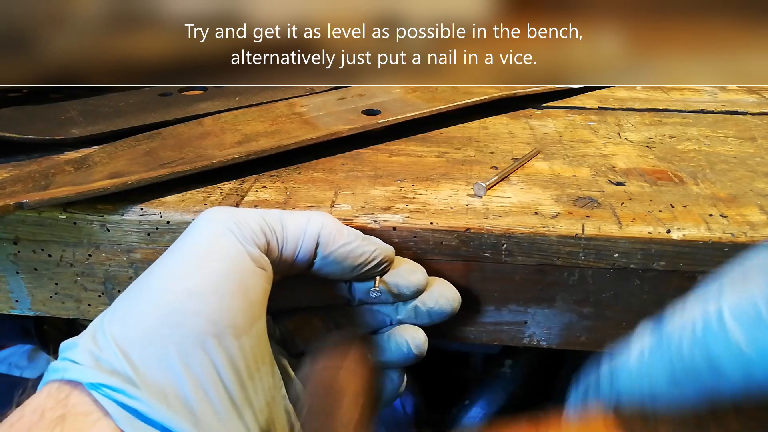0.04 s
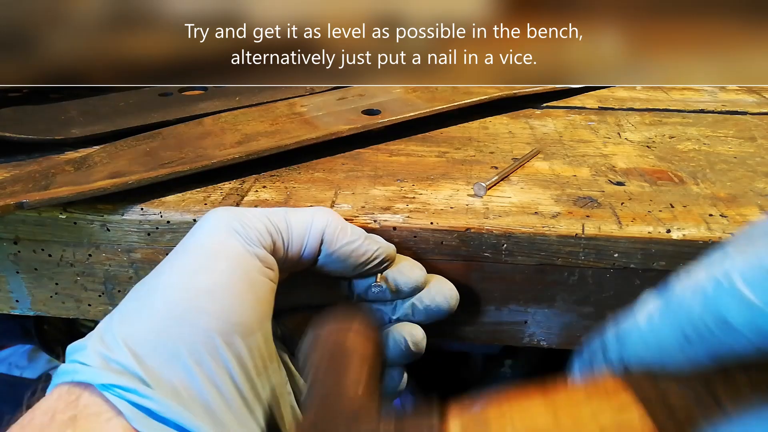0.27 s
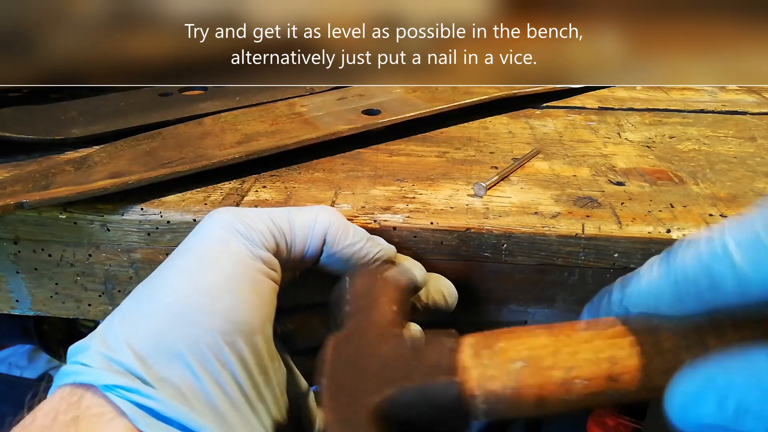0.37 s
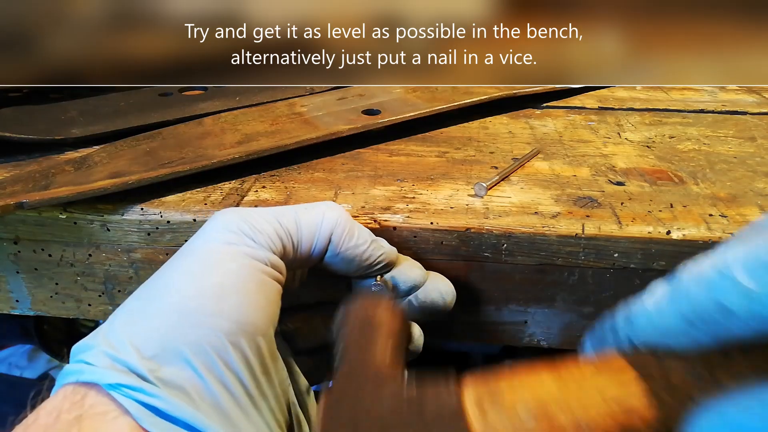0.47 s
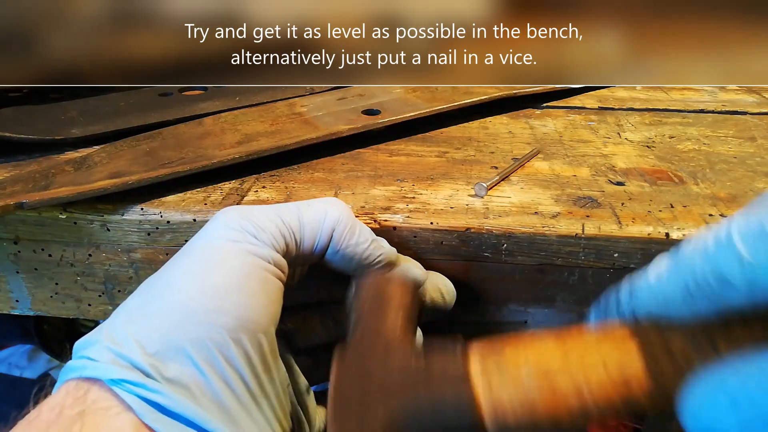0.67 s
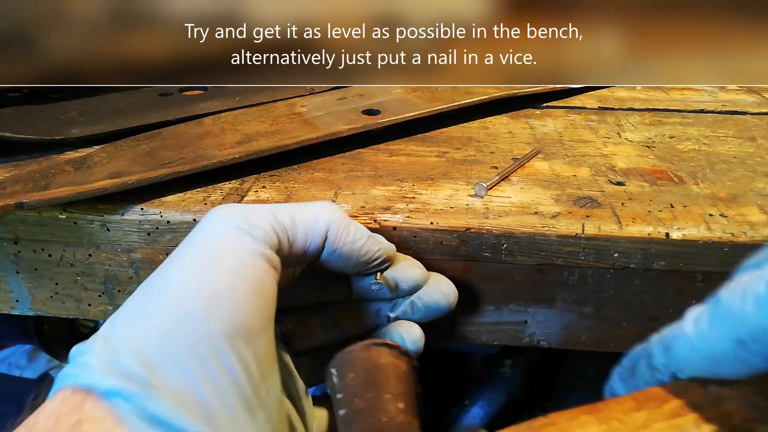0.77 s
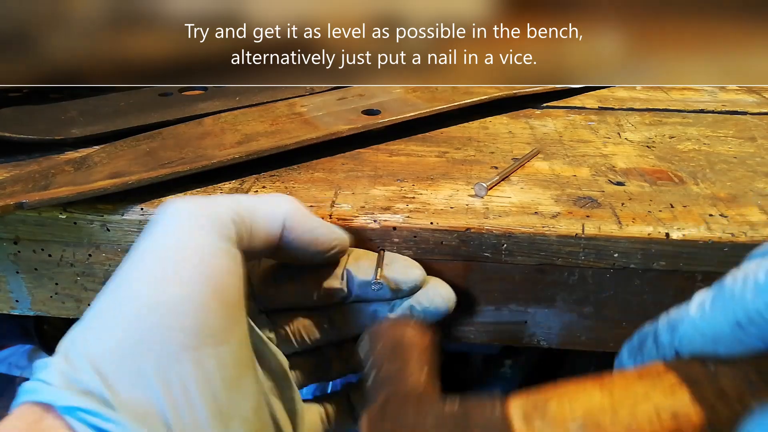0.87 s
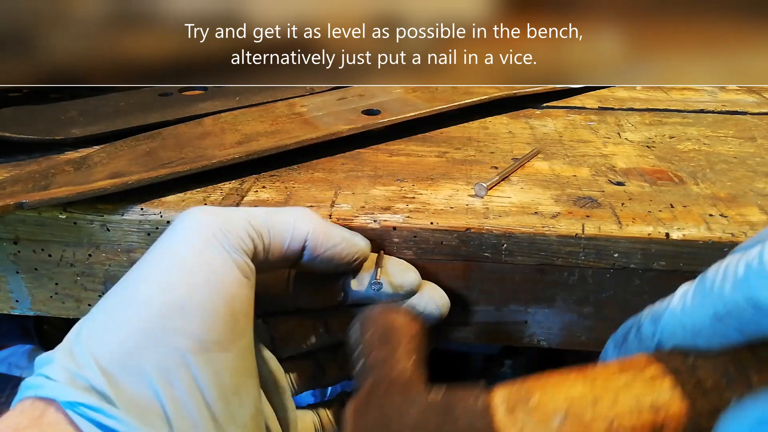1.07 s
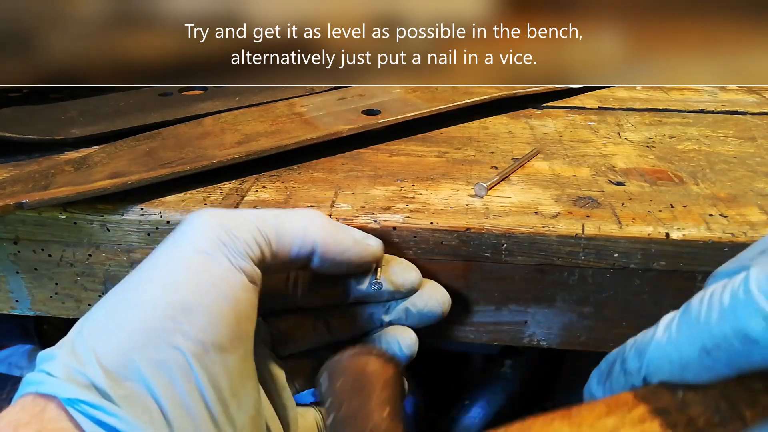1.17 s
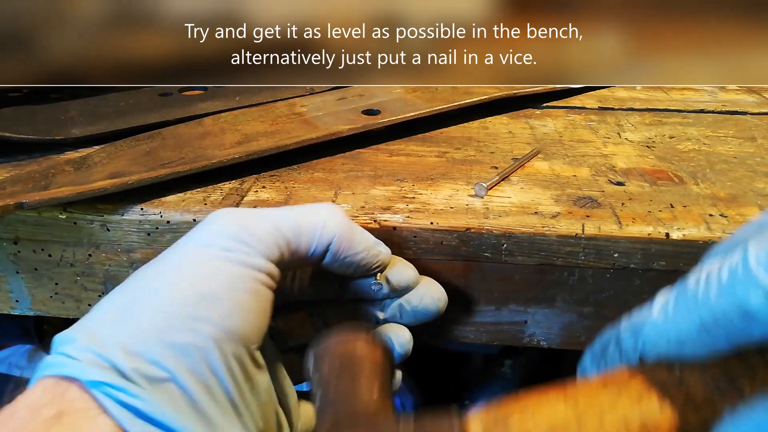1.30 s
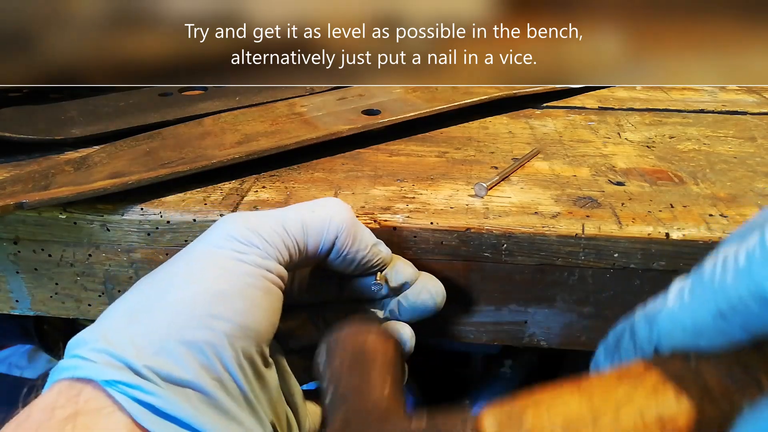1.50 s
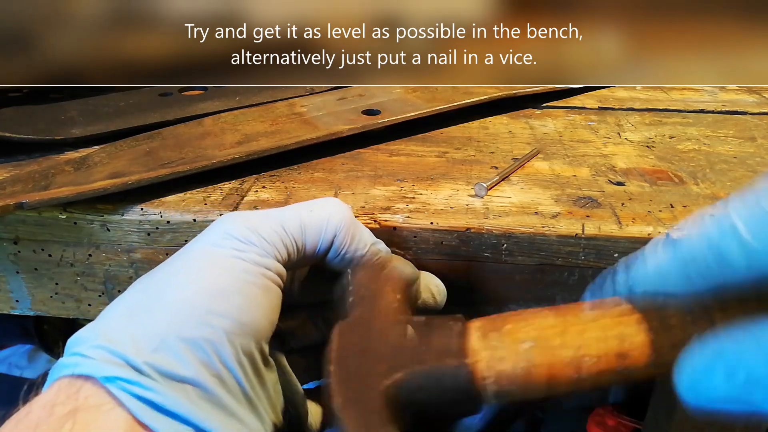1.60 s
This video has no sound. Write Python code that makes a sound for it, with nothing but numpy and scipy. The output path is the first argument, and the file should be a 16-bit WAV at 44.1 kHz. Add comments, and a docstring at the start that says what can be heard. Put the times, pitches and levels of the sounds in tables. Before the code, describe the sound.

Hammer hitting a nail in a wooden bench: the tail of one blow, then three quick hard blows with tiny bounces and a thin metallic ring, then soft rubber glove rustle; close stereo microphone in a garage.

```python
"""The tail of a hammer blow opens the scene; three more blows drive a nail into a wooden garage bench.
Each blow is a burst of coloured clicks (crack), decaying modes (bench) and sines (hammer head, loose steel).
The last three blows bounce once; every strike excites an echo of decaying noise bands.
Rubber gloves then rustle as random grains and ticks. Shaped noise gives a quiet room throughout.
Two close microphone ports hear it in stereo."""
import sys
import numpy as np
from scipy import signal
from scipy.fft import rfft, irfft
from scipy.io import wavfile

SR = 44100
rng = np.random.default_rng(int(sys.argv[2]) if len(sys.argv) > 2 else 0)


def elevation(decibels):
    """Turn decibel levels (scalar or array-like) into linear amplitude ratios."""
    levels = np.asarray(decibels, float)
    return 10 ** (levels / 20)


def unload_audio(sound):
    """Save the sound as a 16-bit wav file, at the path given as the first command line argument."""
    columns = np.transpose(np.atleast_2d(sound))
    # keep every value between -1 and 1, then stretch to whole-number steps
    steps = np.round(np.clip(columns, -1, 1) * 32767)
    wavfile.write(sys.argv[1], SR, steps.astype(np.int16))


N = 72765
LEAD = 2048  # samples before the start, room for the first blow
LEFT_RIGHT_HALVES = np.array([[.5], [-.5]])  # splits a left-minus-right dB between the ports


def table(rows, hz):
    """dB of (Hz, dB) rows on a log-frequency axis."""
    rows = np.array(rows, float)
    return np.interp(np.log(np.maximum(hz, 1)), np.log(rows[:, 0]), rows[:, 1])


def response(rows, tilt_db_per_octave=0., size=1024):
    """Causal (minimum-phase) response of a colour, unit energy, tilted about 4 kHz."""
    hz = np.arange(size // 2 + 1) * SR / size
    tilt_db = tilt_db_per_octave * np.log2(np.clip(hz, 300, 16000) / 4000)
    cepstrum = irfft((table(rows, hz) + tilt_db) * np.log(10) / 20)
    cepstrum[1:size // 2] *= 2
    cepstrum[size // 2 + 1:] = 0
    h = irfft(np.exp(rfft(cepstrum)))
    return h / np.sqrt(np.sum(h ** 2))


def colour(x, rows):
    """Noise shaped to a spectrum, rms 1."""
    n = x.shape[-1]
    hz = np.arange(n // 2 + 1) * SR / n
    y = irfft(rfft(x) * elevation(table(rows, hz)), n)
    return y / np.sqrt(np.mean(y ** 2))


def pair(n, alike_hz):
    """Two noises, alike in the bass and unrelated in the treble."""
    mid, side = rfft(rng.standard_normal((2, n)))
    hz = np.arange(n // 2 + 1) * SR / n + 1
    side = side / np.sqrt(1 + (alike_hz / hz) ** 2)
    return irfft(np.array([mid + side, mid - side]), n)


def decay(t, t60_s):
    """Gain falling 60 dB in t60_s, silent before 0."""
    return (t >= 0) * np.exp(-np.log(1000) * np.maximum(t, 0) / t60_s)


def sine(hz, t):
    """Sine starting at zero phase."""
    return np.sin(2 * np.pi * hz * t)


def add(out, start_s, x, lead=0):
    """Mix x into out at start_s, counted from sample lead."""
    i = int(start_s * SR) + lead
    n = min(x.shape[-1], out.shape[-1] - i)
    out[..., i:i + n] += x[..., :n]


# Room noise spectrum. Each row: frequency in Hz, relative level in dB.
FLOOR_COLOUR = [(12, -31.5), (22, -5.5), (60, -1.5), (117, -12), (273, -12), (372, -20.5), (709, -23),
                (1500, -20), (4000, -23), (9950, -23), (15200, -33), (16500, -46)]
FLOOR_RMS_DB, FLOOR_ALIKE_HZ = -64, 154.4


def room_noise():
    """Steady shaped noise, alike at both ports in the bass."""
    return elevation(FLOOR_RMS_DB) * colour(pair(N, FLOOR_ALIKE_HZ), FLOOR_COLOUR)


# Garage echo bands. Each row: centre in Hz, t60 in s, relative level in dB.
ECHO_BANDS = [(124.6, 0.58, -8.5), (234, 0.3, -9), (500, .27, 2), (1078.1, 0.25, 5), (2000, 0.27, -5),
              (3780, 0.28, -13), (5560, 0.21, -14.5), (10750, 0.38, -26.5), (14960, .11, -15.5)]
ECHO_ONSET_S, ECHO_ALIKE_HZ, ECHO_BAND_OCTAVES = 0.0015, 493, 0.62


def garage():
    """Echo of the walls: noise that builds up fast and dies band by band."""
    n = SR // 2
    t, hz = np.arange(n) / SR, np.arange(n // 2 + 1) * SR / n + 1
    noise, echo = rfft(pair(n, ECHO_ALIKE_HZ)), 0
    for centre_hz, t60_s, db in ECHO_BANDS:
        window = np.exp(-(np.log2(hz / centre_hz) / ECHO_BAND_OCTAVES) ** 2)
        band = irfft(noise * window, n) * decay(t, t60_s)
        # the root evens out band energy across decay times
        echo = echo + elevation(db) * band * np.sqrt(2 * np.log(1000) / t60_s / SR)
    return echo * (1 - np.exp(-(t / ECHO_ONSET_S) ** 2))


# Glove rustle level. Each row: time in s, level in dB.
GLOVE_LEVEL = [(0.84, -66), (0.856, -73), (0.868, -46), (0.908, -47), (0.948, -64.5), (0.978, -60.5),
               (0.988, -68.5), (1.062, -66), (1.102, -50), (1.118, -73), (1.152, -89.5), (1.18, -59.5),
               (1.228, -71), (1.35, -67), (1.354, -84.5), (1.378, -83.5), (1.4, -65.5)]
# Glove spectrum. Each row: frequency in Hz, relative level in dB.
GLOVE_SPECTRUM = [(2350, -30.5), (4000, -17), (5250, -15), (8290, -4), (10000, 0), (11600, -13.5),
                  (15000, -23), (16000, -15.5), (16500, -31)]
# Lone glove ticks. Each row: start in s, level in dB.
TICKS = [(.869, -38), (.9115, -35), (.9735, -48), (1.1795, -48), (1.197, -48), (1.214, -51), (1.347, -50)]
GRAINS_PER_S, GRAIN_SPREAD_DB, GLOVE_LEFT_MINUS_RIGHT_DB = 6000, 0.5, 1.5


def gloves():
    """Rubber sliding on rubber: dense tiny grains and a few lone ticks."""
    t, rows = np.arange(N) / SR, np.array(GLOVE_LEVEL)
    on = rng.random((2, N)) < GRAINS_PER_S / SR
    grains = on * rng.standard_normal((2, N))
    grains = grains * elevation(GRAIN_SPREAD_DB * rng.exponential(size=(2, N)))
    level_db = np.interp(t, rows[:, 0], rows[:, 1], left=-120, right=-120)
    out = colour(grains, GLOVE_SPECTRUM) * elevation(level_db)
    for start_s, db in TICKS:
        add(out, start_s, elevation(db) * response(GLOVE_SPECTRUM) * np.ones((2, 1)))
    return out * elevation(GLOVE_LEFT_MINUS_RIGHT_DB * LEFT_RIGHT_HALVES)


# Loose steel on the bench, tone frequencies in Hz.
LOOSE_STEEL_HZ = [1935, 967]
# Same tones. Each row: level in dB, t60 in s.
LOOSE_STEEL = [(-67, 3.5), (-65, 1.1)]


def steel(length_s):
    """Faint decaying tones of loose steel set ringing by the shaking."""
    t = np.arange(int(length_s * SR)) / SR
    return sum(elevation(db) * decay(t, t60_s) * sine(hz, t)
               for hz, (db, t60_s) in zip(LOOSE_STEEL_HZ, LOOSE_STEEL))


# Hammer head, tone frequencies in Hz.
HEAD_TONE_HZ = [9119, 2713, 5469, 6880]
# Same tones. Each row: relative level in dB, t60 in s, left minus right in dB.
HEAD_TONES = [(-6.5, 2.9, 18), (-13.5, 0.59, -2.5), (-19, 1.1, -10.3), (-31, .4, -9.6)]
HEAD_SWELL_S = 0.012  # the ring is heard fully once the head swings clear
HEAD_DAMP_S = .01


def head(db, length_s):
    """The hammer head sings in decaying sines until something touches it."""
    t = np.arange(int(length_s * SR)) / SR
    ring = 0
    for hz, (tone_db, t60_s, left_minus_right_db) in zip(HEAD_TONE_HZ, HEAD_TONES):
        gain = elevation(tone_db + left_minus_right_db * LEFT_RIGHT_HALVES)
        ring = ring + gain * decay(t, t60_s) * sine(hz, t)
    damping = np.clip((length_s - t) / HEAD_DAMP_S, 0, 1)
    return elevation(db) * ring * damping * (1 - np.exp(-t / HEAD_SWELL_S))


# Microphone port balance. Each row: frequency in Hz, left minus right in dB.
PORT_BALANCE = [(200, -.5), (400, -1), (700, -4.5), (1300, -2), (2400, -2), (4400, -2), (6200, -3),
                (9500, 7), (11500, -2), (16000, -3)]


def port_db(hz):
    """Left and right offsets in dB at hz, half the port difference each way."""
    return table(PORT_BALANCE, hz) * LEFT_RIGHT_HALVES[:, 0]


# Bench modes. Each row: frequency in Hz, relative level in dB, t60 in s.
BENCH_MODES = [(60.4, -28, 0.38), (126.4, -15, .16), (149, -8, 0.15), (185.6, -4, 0.12), (217.6, -12, .1),
               (259.3, -10, 0.16), (288.8, -4.5, 0.081), (326.4, -3, .08), (430, -26, 0.21), (540, -22, .1),
               (698.7, -13, 0.081), (920.7, -31.5, 0.033), (992.5, -22.5, 0.062)]
BENCH_SWELL_S = 0.0092  # the heavy top takes this long to get moving
ROUGHNESS, ROUGHNESS_HZ = .5, 35  # loose boards and tools blur each mode


def bench(db, tilt_db_per_octave):
    """The wooden top swells into its modes, each wavering in size and phase."""
    t = np.arange(SR // 2) / SR
    knots_s = np.arange(0, t[-1] + .1, 1 / ROUGHNESS_HZ)
    ring = 0
    for hz, mode_db, t60_s in BENCH_MODES:
        in_phase, quadrature = (ROUGHNESS * np.interp(t, knots_s, v[:len(knots_s)])
                                for v in rng.standard_normal((2, 256)))
        wave = (1 + in_phase) * sine(hz, t) + quadrature * np.cos(2 * np.pi * hz * t)
        gain = elevation(mode_db + tilt_db_per_octave * np.log2(hz / 250) + port_db(hz)[:, None])
        ring = ring + gain * decay(t, t60_s) * wave
    return elevation(db) * ring * (1 - np.exp(-t / BENCH_SWELL_S))


# Crack spectrum. Each row: frequency in Hz, relative level in dB.
CRACK_COLOUR = [(180, -94.5), (300, -24.5), (1260, -20.5), (3280, -5.5), (4090, -10), (6020, -5.5),
                (7370, -9.5), (9820, 0.5), (10900, -11), (15500, -27.5), (16800, -85)]
CHATTER_S, CHATTER_T60_S, CHATTER_PER_S = .0014, .006, 9000  # full level for CHATTER_S, then decay
CHATTER_TOP_HZ, FIRST_CLICK_DB = 11000, 1  # the chatter is duller than the first click
PORT_LAG_S, PORT_SHARE = .00006, 0.6  # right port lags; share of crack energy common to both


def crack(db, tilt_db_per_octave):
    """Steel on steel: a first click and brief dying chatter, coloured for each port."""
    t = np.arange(1024) / SR
    on = rng.random((3, len(t))) < CHATTER_PER_S / SR
    envelope = np.where(t < CHATTER_S, 1, decay(t - CHATTER_S, CHATTER_T60_S))
    clicks = on * np.sign(rng.standard_normal(on.shape)) * envelope
    clicks = signal.lfilter(*signal.butter(2, CHATTER_TOP_HZ, fs=SR), clicks)
    clicks[:, 0] = -elevation(FIRST_CLICK_DB)
    common, left, right = clicks / np.sqrt(np.sum(clicks ** 2, axis=1, keepdims=True))
    late = np.interp(t - PORT_LAG_S, t, common, left=0)
    ports = []
    for port, (shared, own) in enumerate([(common, left), (late, right)]):
        rows = [(hz, g + port_db(hz)[port]) for hz, g in CRACK_COLOUR]
        mixed = np.sqrt(PORT_SHARE) * shared + np.sqrt(1 - PORT_SHARE) * own
        ports.append(np.convolve(mixed, response(rows, tilt_db_per_octave)))
    return elevation(db) * 2 * np.array(ports)


BENCH_TO_ECHO_DB, CRACK_TO_ECHO_DB = -1.5, 5.5


def strike(crack_db, crack_tilt, bench_db, bench_tilt):
    """Crack and bench together, direct and through the garage echo."""
    wood = bench(bench_db, bench_tilt)
    steel_on_steel = crack(crack_db, crack_tilt)
    send = elevation(BENCH_TO_ECHO_DB) * wood.mean(axis=0)
    add(send, 0, elevation(crack_db + CRACK_TO_ECHO_DB) * response(CRACK_COLOUR, crack_tilt))
    out = signal.fftconvolve(send[None], garage(), axes=1)
    add(out, 0, wood)
    add(out, 0, steel_on_steel)
    return out


# Blows. Each row: start in s, crack in relative dB, crack tilt in dB per octave,
# bench in relative dB, bench tilt in dB per octave, head ring in relative dB.
HAMMER_BLOWS = [(-.012, -3.5, -1, -26.5, -2, -68.5), (0.2122, 7, 1.63, -23, -2, -41.5),
                (0.4326, 6.5, 1.5, -22.5, 3.15, -45), (0.6626, 6.5, -2.5, -18, 3.5, -53.5)]
# The head falls back on the nail. Each row: the first five columns of a blow.
HAMMER_BOUNCES = [(.2257, -15, -1.3, -28.5, -4), (.4490, -11.5, -3.5, -20.5, -1),
                  (0.6807, -11.5, -3, -17, 3)]
HEAD_GRIPPED_S = .865


def scene():
    """Blows and bounces through the garage, then gloves, over room noise."""
    hammering = np.zeros((2, N + LEAD))
    for start_s, *settings in [blow[:5] for blow in HAMMER_BLOWS] + HAMMER_BOUNCES:
        add(hammering, start_s, strike(*settings), LEAD)
    next_blows_s = [blow[0] for blow in HAMMER_BLOWS[1:]]
    for blow, end_s in zip(HAMMER_BLOWS, next_blows_s + [HEAD_GRIPPED_S]):
        add(hammering, blow[0], head(blow[5], end_s - blow[0]), LEAD)
    # each blow starts the loose steel afresh
    for blow, end_s in zip(HAMMER_BLOWS, next_blows_s + [N / SR]):
        add(hammering, blow[0], steel(end_s - blow[0]), LEAD)
    return hammering[:, LEAD:] + gloves() + room_noise()


def low_pass(x):
    """Removes everything above the highest recorded frequency."""
    return signal.sosfilt(signal.butter(12, 16990, fs=SR, output="sos"), x)


LIMIT, TOP_HZ = 1.3, 16600  # ceiling of the rounding, re full scale; lowpass edge


def record(dry):
    """The loudest peaks are rounded by tanh and the top is cut by an elliptic lowpass."""
    rounded = LIMIT * np.tanh(dry / LIMIT)
    lowpass = signal.ellip(8, .2, 60, TOP_HZ, fs=SR, output="sos")
    mix = signal.sosfilt(lowpass, rounded)
    return low_pass(mix)


dry = scene()
out = record(dry)
unload_audio(out)
```